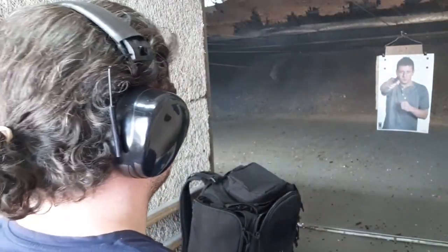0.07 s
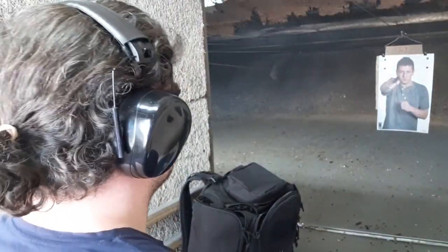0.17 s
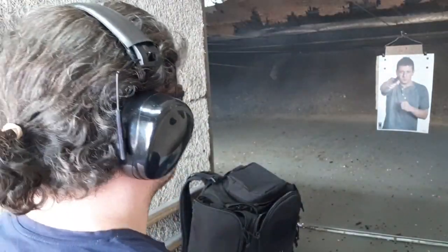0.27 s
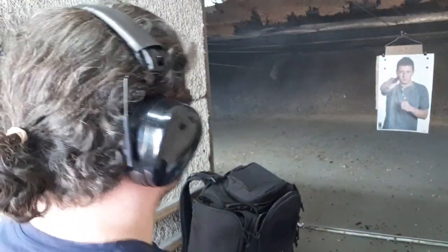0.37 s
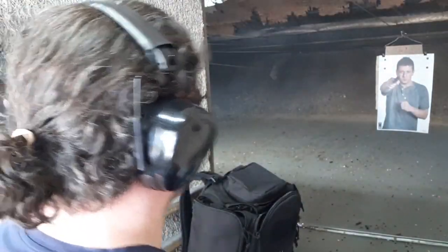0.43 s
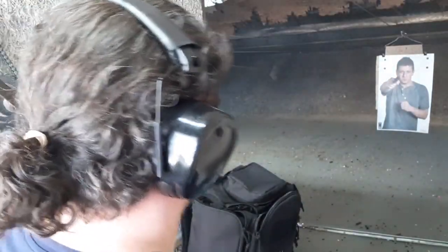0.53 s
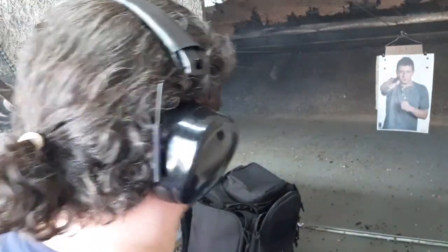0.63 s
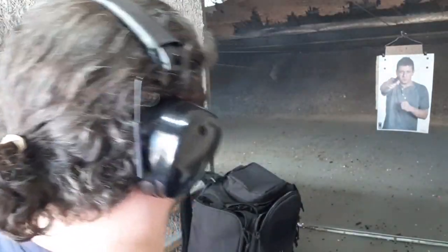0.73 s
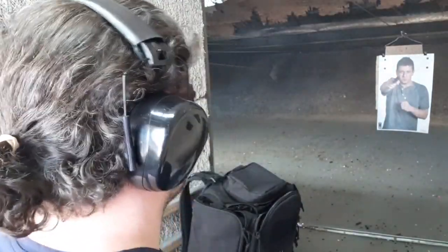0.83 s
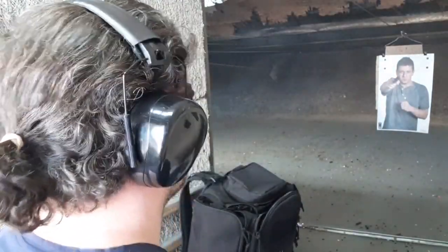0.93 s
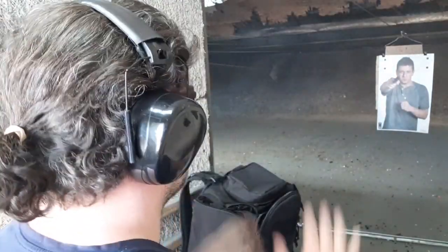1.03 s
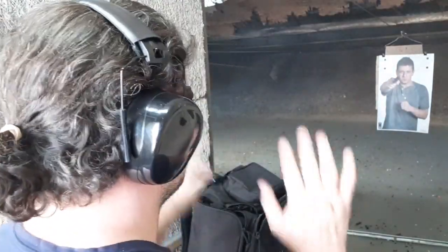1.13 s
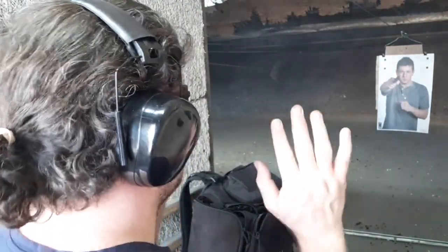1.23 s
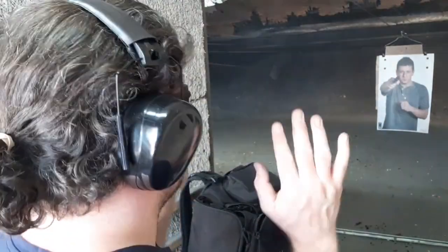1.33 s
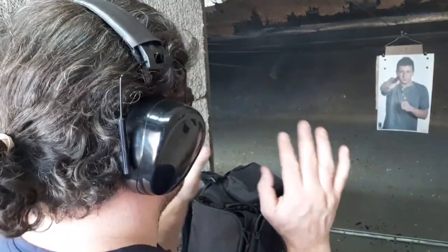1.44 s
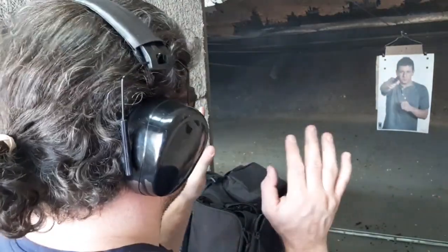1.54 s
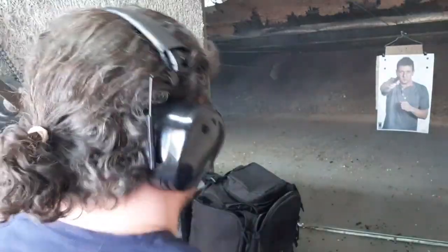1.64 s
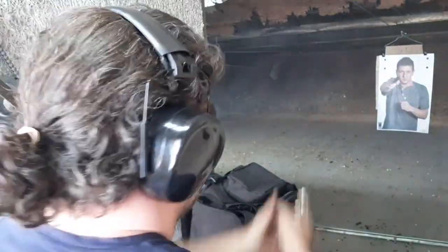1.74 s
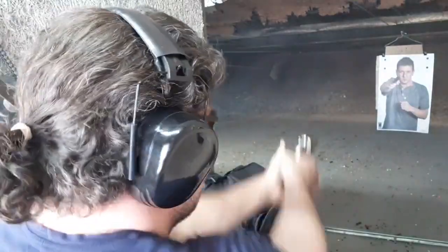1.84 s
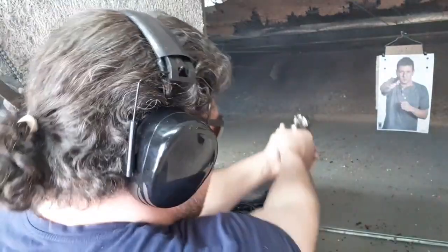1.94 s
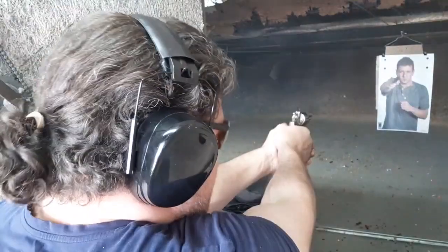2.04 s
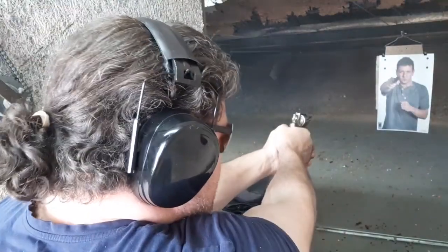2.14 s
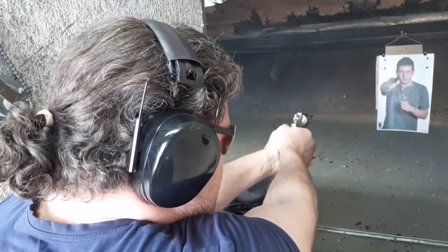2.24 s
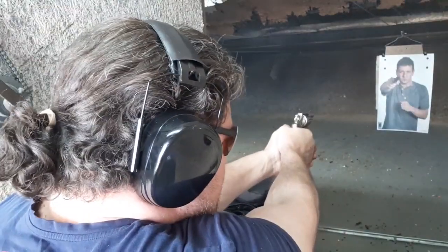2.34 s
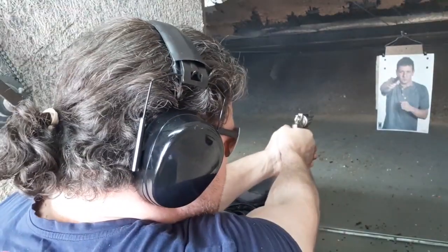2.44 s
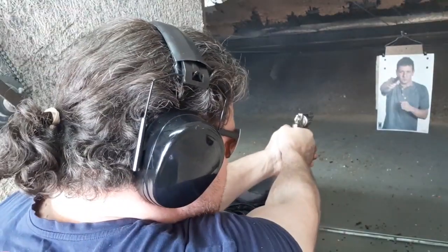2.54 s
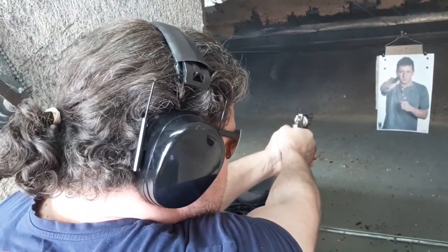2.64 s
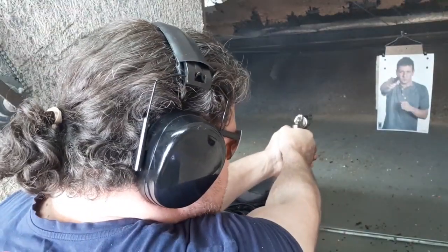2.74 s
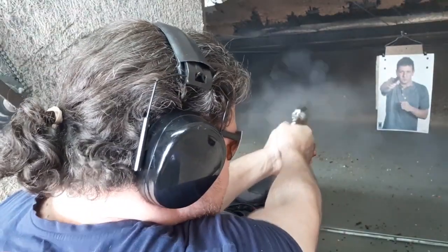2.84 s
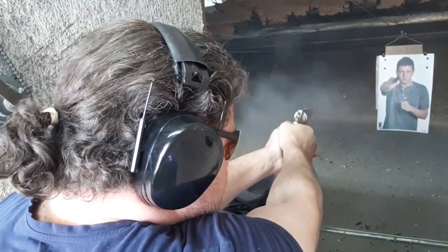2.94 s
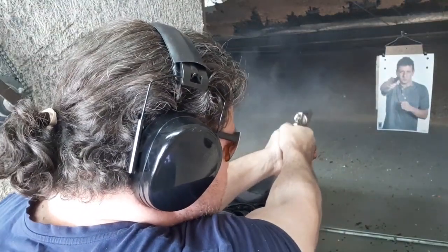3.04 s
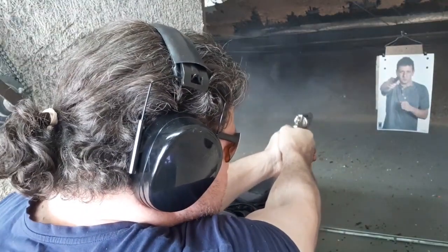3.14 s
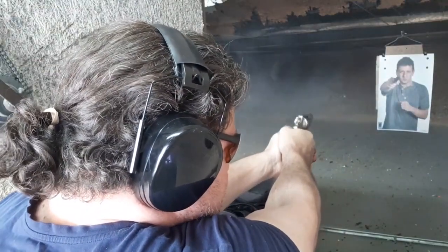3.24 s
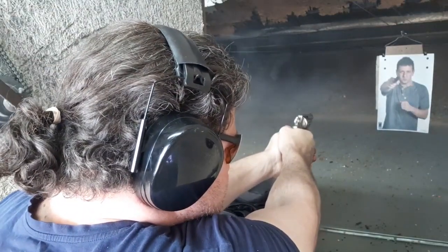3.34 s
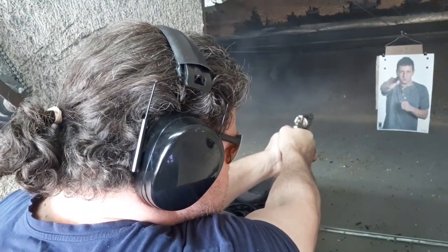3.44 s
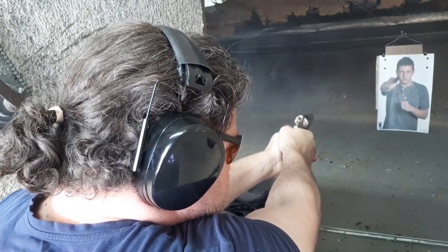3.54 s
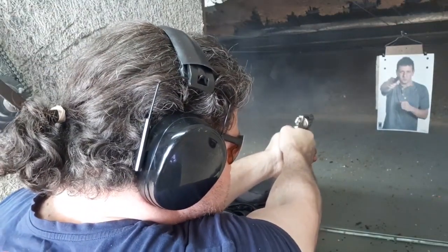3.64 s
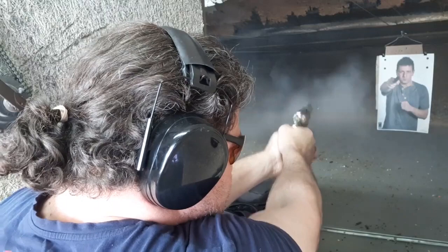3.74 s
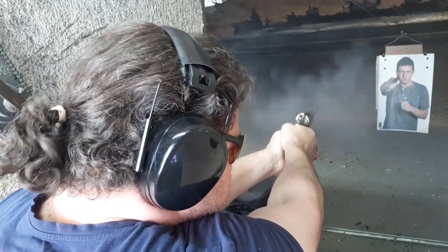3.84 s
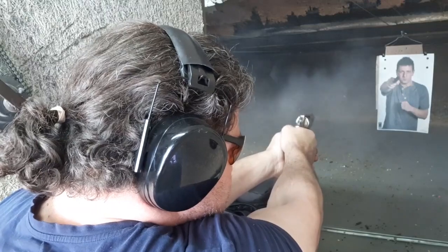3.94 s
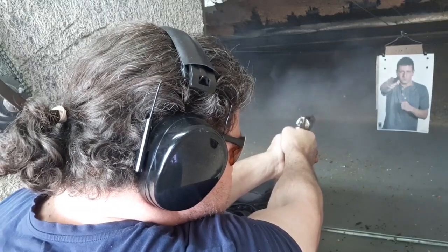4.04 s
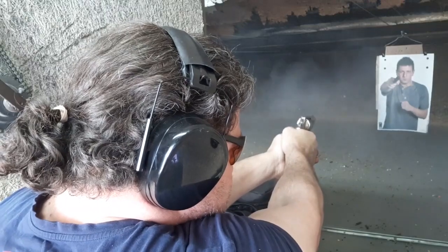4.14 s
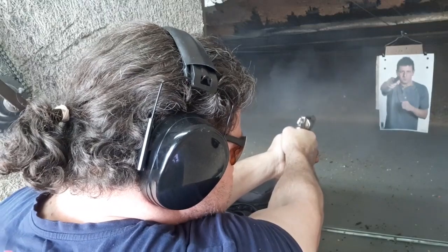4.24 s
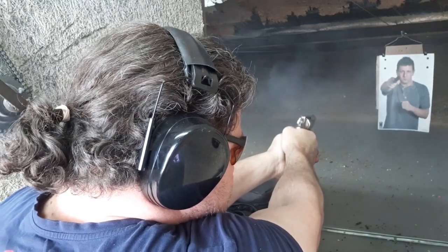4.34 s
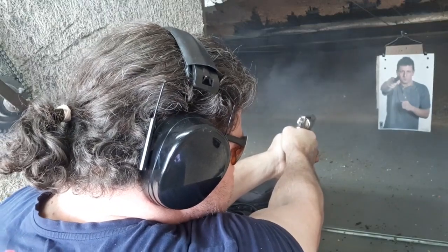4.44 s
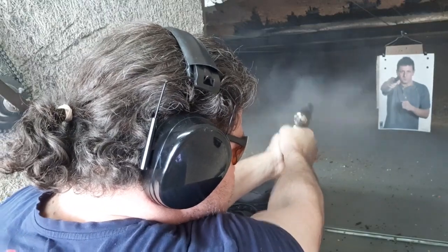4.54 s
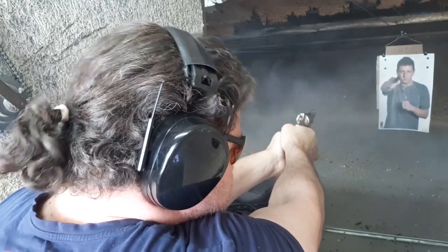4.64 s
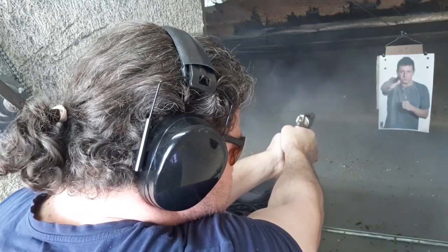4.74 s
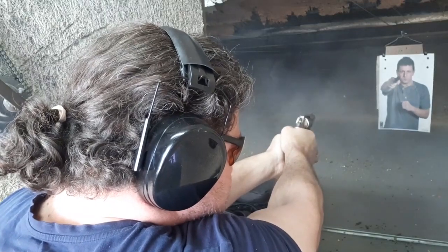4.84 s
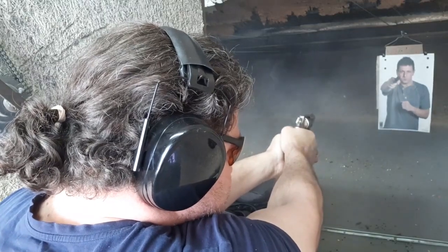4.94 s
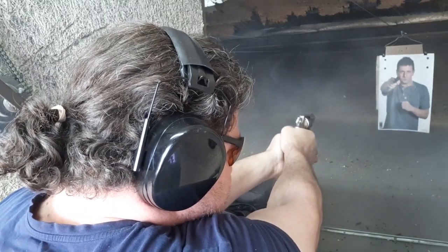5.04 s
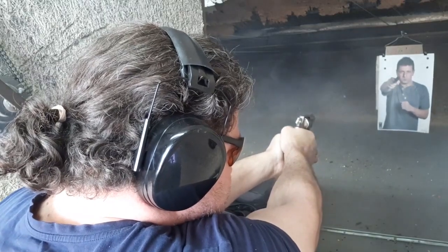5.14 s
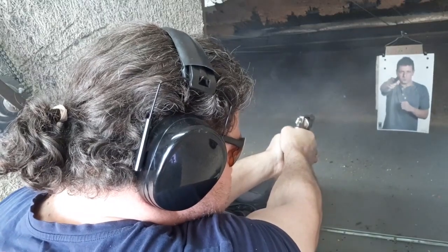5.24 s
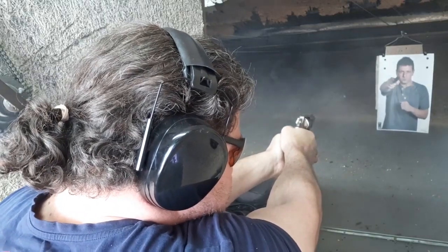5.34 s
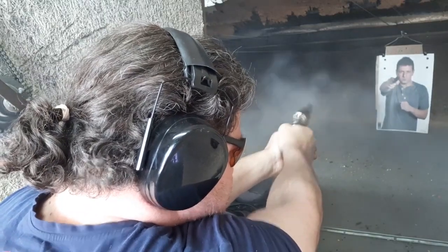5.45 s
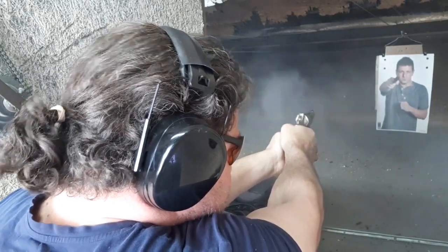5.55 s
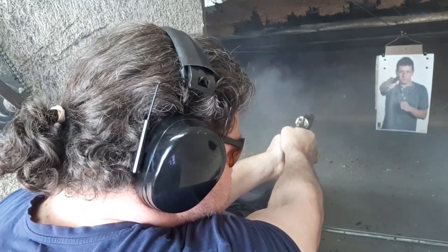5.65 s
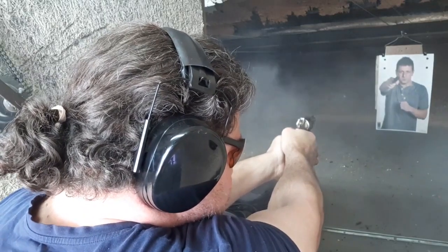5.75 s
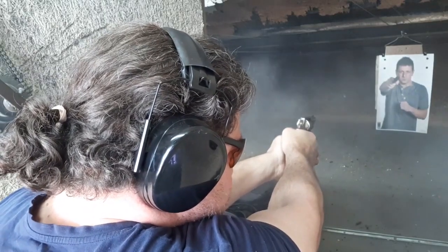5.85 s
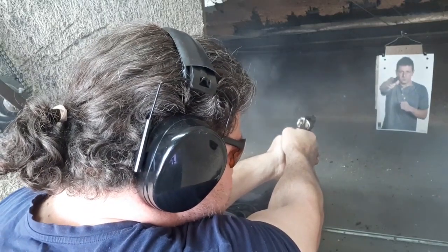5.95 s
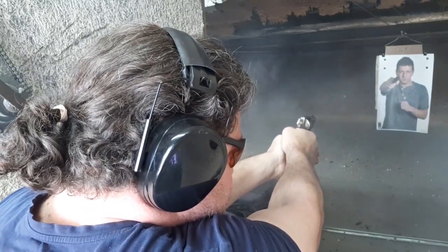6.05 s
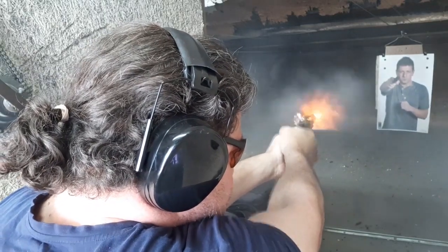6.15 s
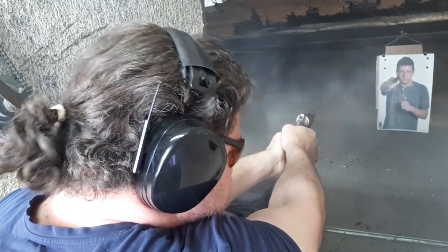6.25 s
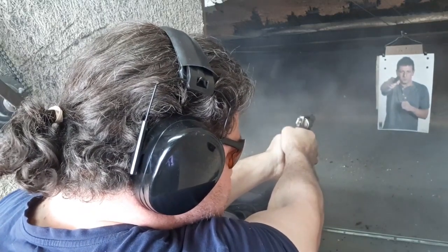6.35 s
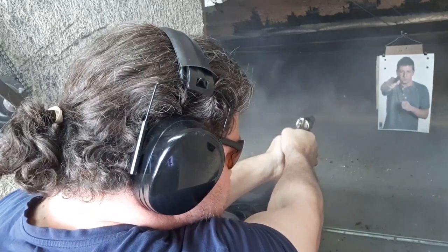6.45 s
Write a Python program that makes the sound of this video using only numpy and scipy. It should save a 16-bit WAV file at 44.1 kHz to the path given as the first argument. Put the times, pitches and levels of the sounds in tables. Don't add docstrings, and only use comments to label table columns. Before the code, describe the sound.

A hard, reverberant indoor range with quiet duct noise and a low fan hum. A thin brass ring opens it; a small knock at 0.3 s precedes a neighbouring lane's loud blast at 0.36, its echo decaying over most of a second. Brass tinkles through the tail, a bright hard clack lands at 1.15, more knocks and a high ring at 1.36, and a muffled low shot comes through a wall at 1.63. The neighbour fires again at 2.38. Then the close revolver fires at 2.85, 3.77, 4.58, 5.46 and 6.19, each with two tiny clicks just before, a sharp crack, dense bright reflections and a booming, swelling hall tail. Faint reset clicks and thin steel pings fall between shots. The left microphone overloads into flattened, crunchy blasts; the blocked right one carries only a faint, dull copy. The last echo is cut short.

```python
import sys
import numpy as np
from scipy import signal
from scipy.io import wavfile

SR = 44100
rng = np.random.default_rng(int(sys.argv[2]) if len(sys.argv) > 2 else 0)


def to_wav(s):
    ch = np.atleast_2d(s).T
    pcm = np.round(np.clip(ch, -1, 1) * 32767)
    wavfile.write(sys.argv[1], SR, pcm.astype(np.int16))


def gain_from_db(level_db):
    decades = np.asarray(level_db, float) / 20
    return 10 ** decades


N = 286209


def at_hz(points, hz, column=1):
    table = np.array(points)
    return np.interp(np.log(hz), np.log(table[:, 0]), table[:, column])


def add(out, start_s, sound):
    i = int(start_s * SR)
    out[i:i + len(sound)] += sound[:len(out) - i]


def dying(t60, rise, seconds, bend=1):
    t = np.arange(int(seconds * SR)) / SR
    return (1 - np.exp(-t / max(rise, 1e-4))) * gain_from_db(-60 * (t / t60) ** bend)


def narrow(white, low_hz, high_hz):
    edges = np.clip([low_hz, high_hz], 50, 19000)
    x = signal.sosfilt(signal.butter(1, edges, "band", fs=SR, output="sos"), white)
    return x / x.std()


def narrow_twice(white, low_hz, high_hz):
    return narrow(narrow(white, low_hz, high_hz), low_hz, high_hz)


def bands(length):
    edges = 28 * 2 ** np.arange(0, 9.4, 1 / 3)
    settle = 4000
    white = rng.standard_normal((2, length + settle))
    for k, (low, high) in enumerate(zip(edges, edges[1:])):
        band = signal.butter(2, [low, high], "band", fs=SR, output="sos")
        yield np.sqrt(low * high), signal.sosfilt(band, white[k % 2])[settle:]


# pitch_hz [Hz], level_db [dB per Hz]
AIR_COLOUR = [(78, -39), (115, -0.5), (850, -10.5), (1400, -24), (2000, -21.5), (2800, -25), (6500, -28.5),
              (16000, -47)]


def ventilation():
    air_db, hum_db = -45.5, -49
    hum_hz, half_width_hz, waver_depth = 67.2, 5, .35
    air = sum(gain_from_db(at_hz(AIR_COLOUR, hz)) * noise for hz, noise in bands(N))
    waver = narrow_twice(rng.standard_normal(N), hum_hz - half_width_hz, hum_hz + half_width_hz)
    hum = np.sin(2 * np.pi * hum_hz * np.arange(N) / SR) + waver_depth * waver
    return gain_from_db(air_db) * air / air.std() + gain_from_db(hum_db) * hum


# start_s [s], level_db [dB]
BRASS_RINGS = [(0.001, -38.5), (0.62, -52), (0.761, -51), (0.974, -59), (1.361, -35.5), (2.247, -42.5),
               (2.785, -56.5), (3.36, -59.5)]


def brass():
    ring_hz, half_width_hz, t60_s = 11650, 150, .26
    out, t = np.zeros(N), np.arange(SR // 2) / SR
    for start_s, level_db in BRASS_RINGS:
        ring = narrow(rng.standard_normal(SR // 2), ring_hz - half_width_hz, ring_hz + half_width_hz)
        ring = narrow(ring, ring_hz - half_width_hz / 2, ring_hz + half_width_hz / 2)
        add(out, start_s, gain_from_db(level_db - 60 * t / t60_s) * ring)
    return out


def add_tick(out, start_s, level_db, pitch_hz, octaves, t60_s):
    t = np.arange(SR // 2) / SR
    snap = 1 + 2.2 * np.exp(-t / 0.00053)
    low_hz, high_hz = pitch_hz * 2 ** (-.7 * octaves), pitch_hz * 2 ** (.7 * octaves)
    noise = narrow_twice(rng.standard_normal(SR // 2), low_hz, high_hz)
    add(out, start_s, gain_from_db(level_db - 60 * t / t60_s) * snap * noise)


# start_s [s], level_db [dB], pitch_hz [Hz], width [octaves], t60_s [s]
HITS = [(0.304, -37, 2900, 0.9, .09), (1.1512, -33, 3000, 8, 0.19), (1.1518, -17, 6500, 0.33, 0.13),
        (1.156, -30, 5600, 0.45, 0.31), (1.359, -39.5, 670, 0.83, 0.25), (1.361, -40.5, 4560, 0.73, 0.34),
        (1.378, -43, 4400, 0.43, 0.11), (1.6293, -33, 6000, 3.0, 0.01), (1.7477, -45.5, 6100, 0.2, .12),
        (2.247, -49.5, 4860, 0.41, 0.36)]


def knocks():
    out = np.zeros(N)
    for row in HITS:
        add_tick(out, *row)
    return out


# start_s [s], strength_db [dB], lane [0 a neighbour's, 1 the revolver's]
GUNSHOTS = [
    (0.3588, .4, 0.),
    (2.3759, .1, 0.),
    (2.846, -.1, 1.),
    (3.772, .1, 1.),
    (4.576, .1, 1.),
    (5.4577, .2, 1.),
    (6.1851, -.2, 1.),
]
# blast_db [dB], early_db (first reflections) [dB], tail_db (hall) [dB],
# brightness [dB per octave], rise_s of the reflections [s]
LANE_SOUND = [
    (15, 6, 7.5, 1.7, .004),
    (10, 24.5, 7, 1.66, .0012),
]
# pitch_hz [Hz], level_db [dB per Hz]
EARLY_COLOUR = [(100, -19), (300, -9.5), (700, -24), (1500, -2.5), (3000, -9.5), (6000, -11), (11000, -8.5),
                (16000, -12)]
# pitch_hz [Hz], level_db [dB per Hz]
TAIL_COLOUR = [(40, -30), (85, -7.5), (500, .5), (1150, -4), (2100, -16), (6500, -19), (11000, -14.5),
               (16000, -27)]
# pitch_hz [Hz], t60_s [s], rise_s [s]
HALL_DECAY = [(60, 0.87, 0.015), (188, 0.76, 0.044), (565, 0.73, 0.0078), (1440, 0.62, 0.007),
              (4030, 0.65, 0.0075)]
# delay_s [s], level_db [dB]
FAR_SLAPS = [(.103, -28), (.262, -62)]
# pitch_hz [Hz], level_db [dB], t60_s [s], swell_s [s]
BOOTH_TONES = [(141.8, -20.5, 0.92, 0.066), (203.2, -7, 0.51, 0.094), (214.5, -7.5, 0.53, 0.12),
               (326, -14.5, .55, 0.088), (338, -15.5, .55, 0.12), (494, -13.5, .6, 0.066),
               (649, -4.5, 0.34, 0.021)]


def gunfire():
    blast_s, early_t60_s, slap_t60_s, bend = 0.0025, 0.11, .04, 1.179
    crack, crack_s = .5, .014
    air_loss_hz = 7530
    same_paths = .9
    out, hall, span = np.zeros(N), np.zeros(N), 3 * SR // 2
    seconds, t = span / SR, np.arange(span) / SR
    shots = [(start_s, db, round(lane)) for start_s, db, lane in GUNSHOTS]

    bursts = []
    for *rest, rise_s in LANE_SOUND:
        burst = dying(early_t60_s, rise_s, seconds) * (1 + crack * np.exp(-t / crack_s))
        for delay_s, slap_db in FAR_SLAPS:
            add(burst, delay_s, gain_from_db(slap_db) * dying(slap_t60_s, 0.0017, seconds=.2))
        bursts.append(burst)

    for hz, noise in bands(N + 3 * span):
        t60_s = 1 / (1 / at_hz(HALL_DECAY, hz) + (hz / air_loss_hz) ** 2)
        swell_s = at_hz(HALL_DECAY, hz, column=2)
        tail = gain_from_db(10.5 + at_hz(TAIL_COLOUR, hz)) * dying(t60_s, swell_s, seconds, bend)
        for start_s, db, lane in shots:
            blast_db, early_db, tail_db, tilt_db, rise_s = LANE_SOUND[lane]
            shared = noise[N + span * (1 + lane):][:span]
            own = noise[int(start_s * SR):][:span]
            paths = same_paths * shared + np.sqrt(1 - same_paths ** 2) * own
            paths = paths * gain_from_db(db + tilt_db * np.log2(hz / 1000))
            add(out, start_s, gain_from_db(early_db + at_hz(EARLY_COLOUR, hz)) * bursts[lane] * paths)
            add(hall, start_s, gain_from_db(tail_db) * tail * paths)

    phase = np.arange(int(blast_s * SR)) / (blast_s * SR)
    pulse = np.sin(2 * np.pi * phase ** 0.59) * (0.035 + phase)
    booth = np.zeros(span)
    for hz, db, t60_s, swell_s in BOOTH_TONES:
        booth += gain_from_db(db) * np.sin(2 * np.pi * hz * t) * dying(t60_s, swell_s, seconds, bend)
    for start_s, db, lane in shots:
        add(out, start_s, gain_from_db(db + LANE_SOUND[lane][0]) * pulse)
        add(hall, start_s, lane * gain_from_db(db) * booth)
    return out, hall


def next_door():
    start_s, level_db, leak_db = 1.6292, -26.5, -19
    white, out = rng.standard_normal(SR), np.zeros(N)
    body = narrow_twice(white, 117, 1275)
    fade = dying(0.64, 0.0024, seconds=1) + 0.21 * dying(0.19, .002, seconds=1)
    add(out, start_s, gain_from_db(level_db) * body * fade)
    leak = narrow(narrow(white, 1100, 4200), 1100, 5200)
    add(out, start_s, gain_from_db(level_db + leak_db) * leak * dying(0.5, .001, seconds=1))
    return out


# lock_s (cylinder locks) [s], slip_s (hammer slips) [s], level_db [dB]
TRIGGER_PULLS = [
    (2.8198, 2.835, -35),
    (3.7426, 3.7617, -36),
    (4.5416, 4.5545, -35),
    (5.4332, 5.447, -35),
    (6.1595, 6.173, -34),
]


def trigger_pulls():
    out = np.zeros(N)
    for lock_s, slip_s, level_db in TRIGGER_PULLS:
        add_tick(out, lock_s, level_db, 8500, octaves=1.4, t60_s=.028)
        add_tick(out, slip_s, level_db, 8000, octaves=1.5, t60_s=.05)
    strike_lead_s = .0011
    for start_s, strength_db, lane in GUNSHOTS:
        if lane > .5:
            add_tick(out, start_s - strike_lead_s, -29, 3500, octaves=2.5, t60_s=.01)
    return out


# start_s [s], level_db [dB], pitch_hz [Hz]
TRIGGER_RESETS = [(3.18, -56, 9000), (4.147, -55, 10000), (4.25, -49, 4930), (5.05, -47.5, 5500),
                  (5.25, -48, 4300)]


def trigger_resets():
    out = np.zeros(N)
    for row in TRIGGER_RESETS:
        add_tick(out, *row, octaves=1.1, t60_s=0.056)
    return out


# start_s [s], level_db [dB], pitch_hz [Hz]
PART_PINGS = [(5.2456, -62.5, 12800), (5.284, -54.5, 13500), (5.398, -60, 10650), (5.779, -50, 11300),
              (6.106, -55.5, 15000), (6.131, -58, 13200)]


def pings():
    out = np.zeros(N)
    for row in PART_PINGS:
        add_tick(out, *row, octaves=0.12, t60_s=0.14)
    return out


# pitch_hz [Hz], width_hz [Hz], gain_db [dB]
HALL_WAVES = [(121, 14, 6), (205.5, 22, 3), (318, 14, 3), (535, 6.1, -4.5), (657, 30, 1.5), (772, 32, 1.5),
              (960, 42, 2.5), (1156, 10, -1), (1350, 15, -1.5), (1535, 58, -0.5)]


def standing(x):
    out = x.copy()
    for hz, width_hz, gain_db in HALL_WAVES:
        resonance = signal.lfilter(*signal.iirpeak(hz, hz / width_hz, fs=SR), x)
        out += (gain_from_db(gain_db) - 1) * resonance
    return out


def scene():
    blocked_air_db = -7.5
    blocked_early_db, lag_s, detour_db = 10, .001, 4
    air = ventilation()
    clicks = brass() + knocks() + trigger_pulls() + trigger_resets() + pings()
    early, tail = gunfire()
    rest = standing(tail + next_door()) + clicks

    far = rest + gain_from_db(blocked_air_db) * air
    paths = rng.standard_normal(SR // 4) * dying(.18, .002, seconds=.25)
    detours = gain_from_db(detour_db) * paths / np.linalg.norm(paths)
    far = far + signal.oaconvolve(far, detours)[:N]
    far = far + gain_from_db(blocked_early_db) * early
    late = np.concatenate([np.zeros(int(lag_s * SR)), far])[:N]
    return np.array([rest + air + early, late])


def port(x, points):
    hz = np.linspace(0, SR / 2, 513)
    squared = signal.firwin2(1023, hz, gain_from_db(2 * at_hz(points, np.maximum(hz, 20))), fs=SR)
    return signal.oaconvolve(x, signal.minimum_phase(squared, n_fft=16384))[:N]


# pitch_hz [Hz], level_db [dB]
OPEN_COLOUR = [(20, 4.5), (5000, -0.5), (6700, 0.5), (7300, -12.5), (9000, -15), (12500, -7.5),
               (15500, -6.5), (15900, -45.5)]


def open_microphone(x):
    capsule_top, droop_hz, sub_db, limit = 0.94, 122.3, -26.5, 1.09
    x = port(capsule_top * np.tanh(x / capsule_top), OPEN_COLOUR)
    low_cut = signal.butter(2, droop_hz, "high", fs=SR, output="sos")
    x = signal.sosfilt(low_cut, x) + gain_from_db(sub_db) * x
    return x / (1 + np.abs(x / limit) ** 4) ** (1 / 4)


# pitch_hz [Hz], level_db [dB]
BLOCKED_COLOUR = [(40, -56), (340, -54.5), (1000, -47), (2300, -42), (4400, -45), (5300, -50.5),
                  (7000, -50.5), (10000, -52)]


def blocked_microphone(x):
    cut_hz, hiss_db = 5300, -99
    x = port(x, BLOCKED_COLOUR)
    x = signal.sosfilt(signal.butter(8, cut_hz, fs=SR, output="sos"), x)
    return x + gain_from_db(hiss_db) * rng.standard_normal(N)


def band_limit(x):
    return signal.sosfilt(signal.butter(12, 15750, fs=SR, output="sos"), x)


def record(dry):
    left = open_microphone(dry[0])
    right = blocked_microphone(dry[1])
    return band_limit(np.array([left, right]))


dry = scene()
out = record(dry)
to_wav(out)
```